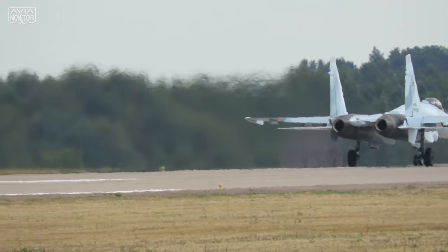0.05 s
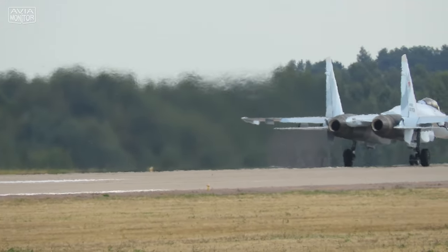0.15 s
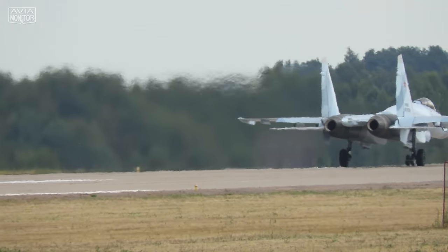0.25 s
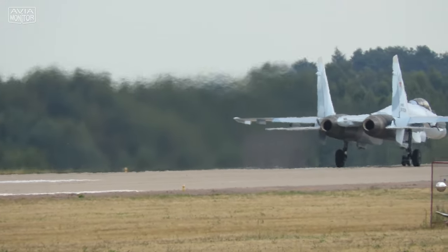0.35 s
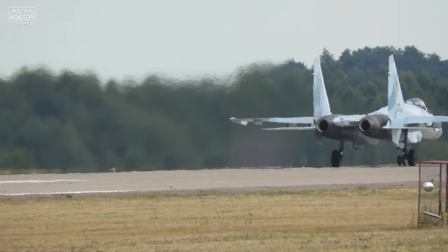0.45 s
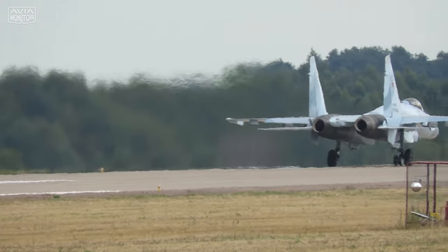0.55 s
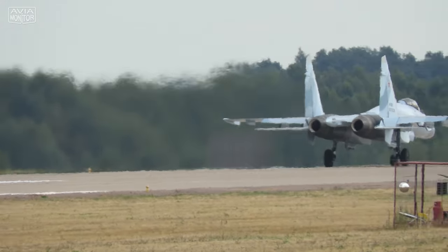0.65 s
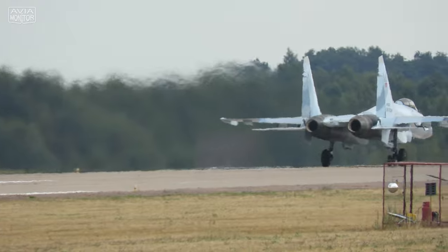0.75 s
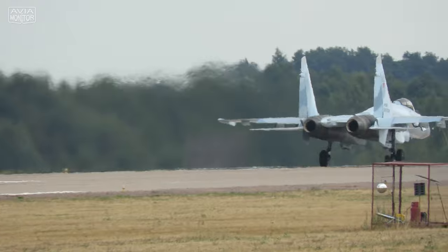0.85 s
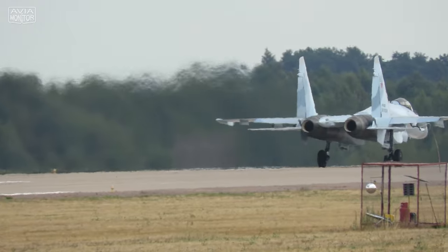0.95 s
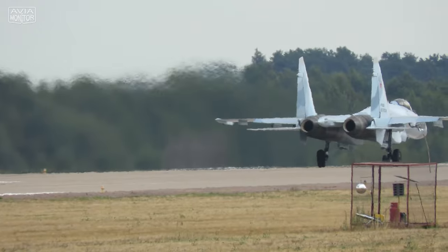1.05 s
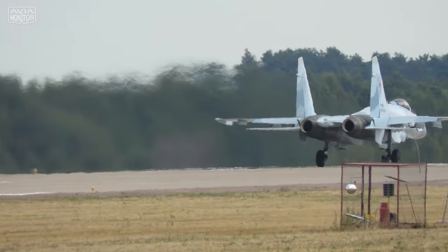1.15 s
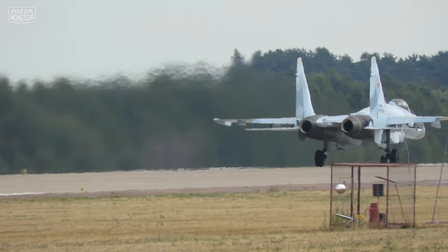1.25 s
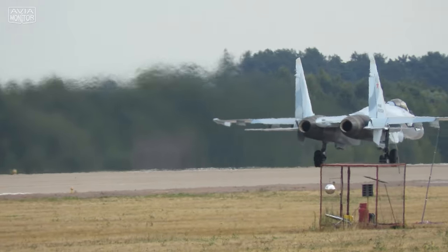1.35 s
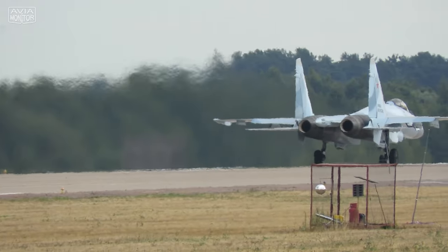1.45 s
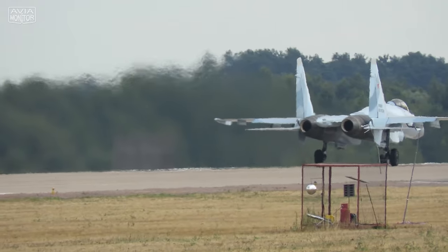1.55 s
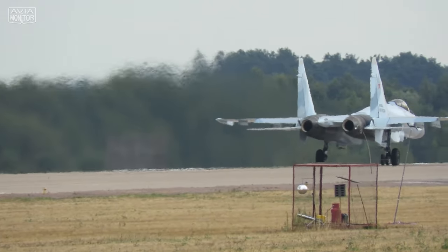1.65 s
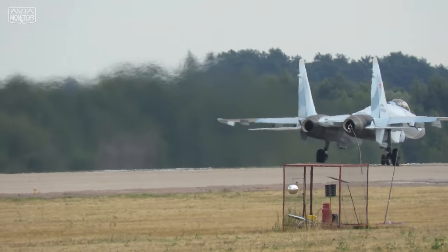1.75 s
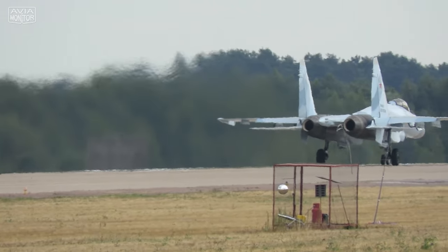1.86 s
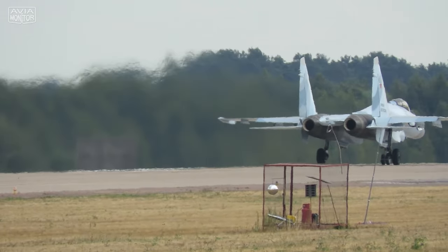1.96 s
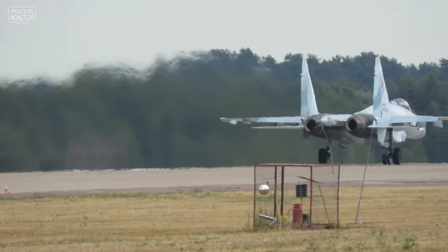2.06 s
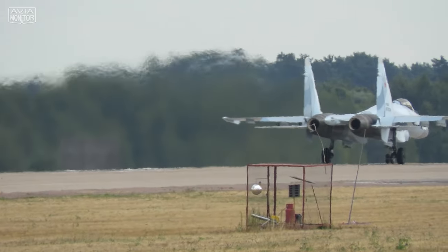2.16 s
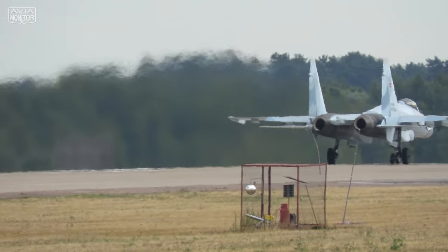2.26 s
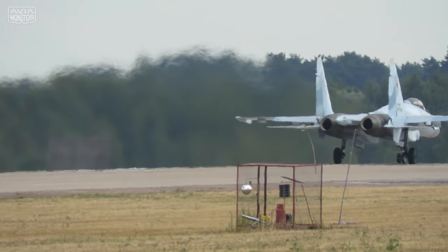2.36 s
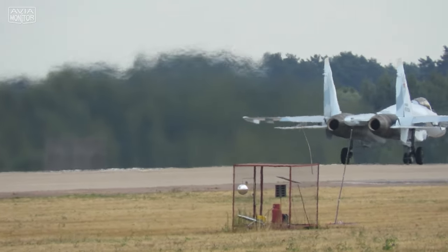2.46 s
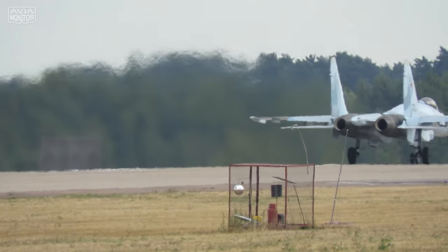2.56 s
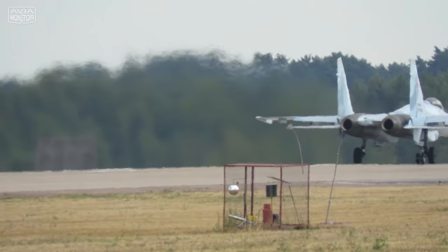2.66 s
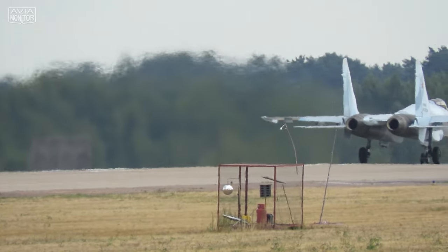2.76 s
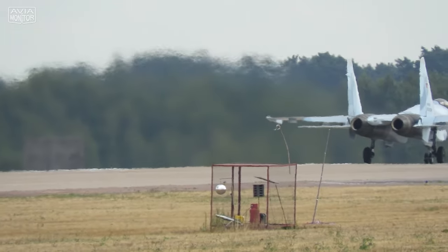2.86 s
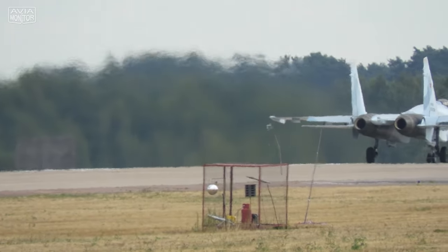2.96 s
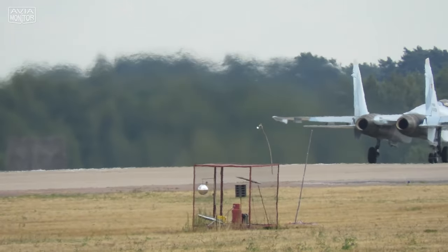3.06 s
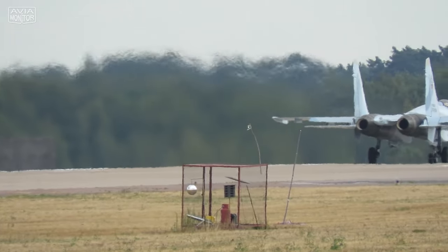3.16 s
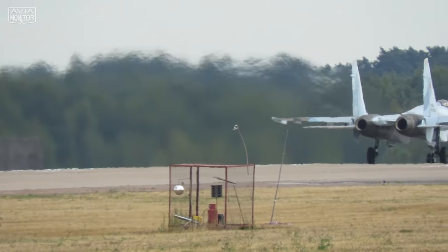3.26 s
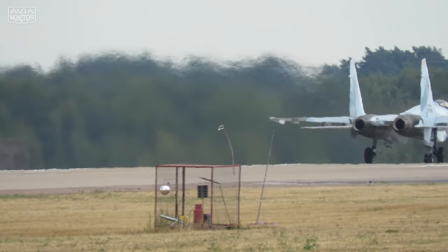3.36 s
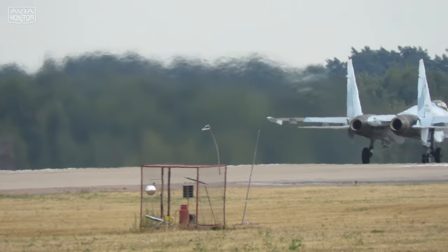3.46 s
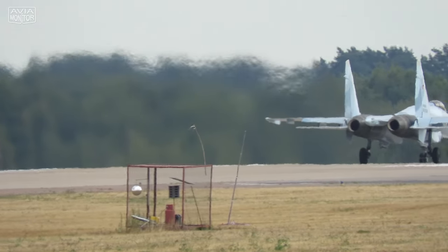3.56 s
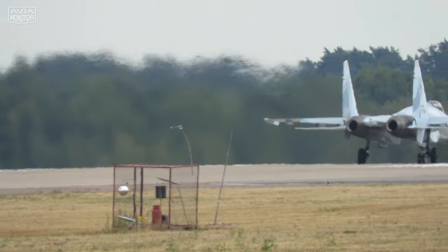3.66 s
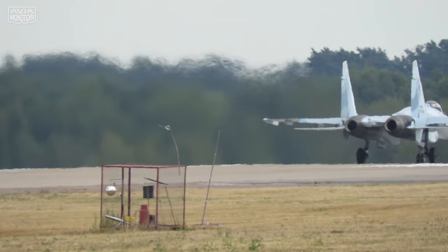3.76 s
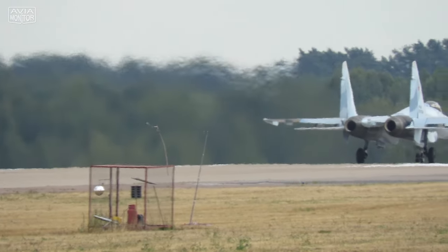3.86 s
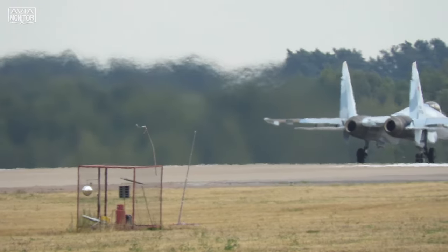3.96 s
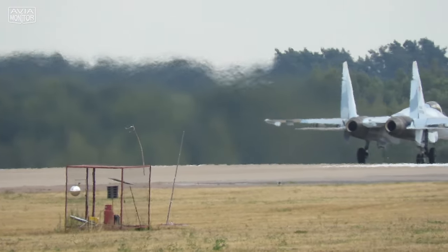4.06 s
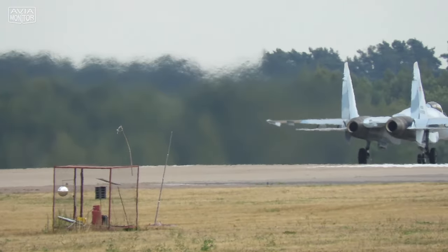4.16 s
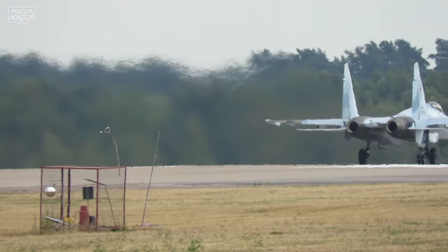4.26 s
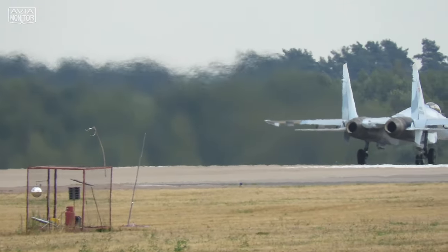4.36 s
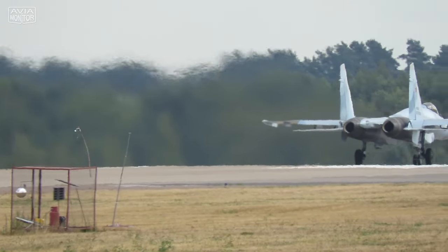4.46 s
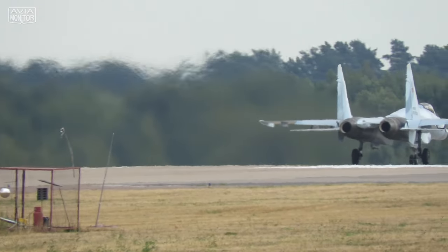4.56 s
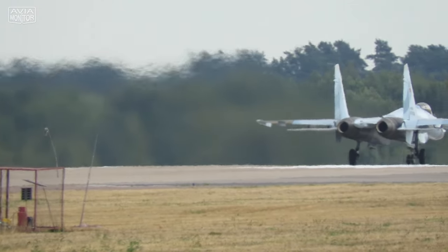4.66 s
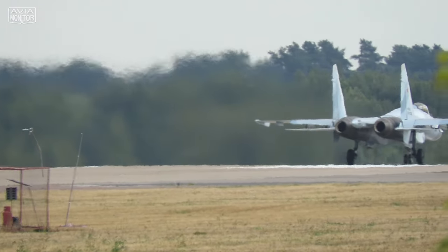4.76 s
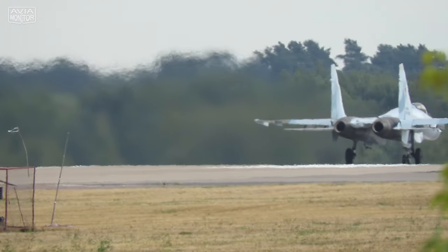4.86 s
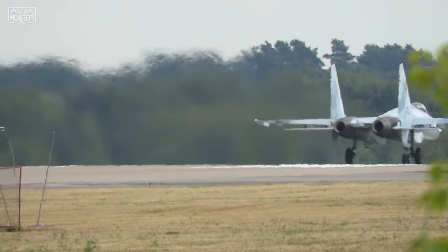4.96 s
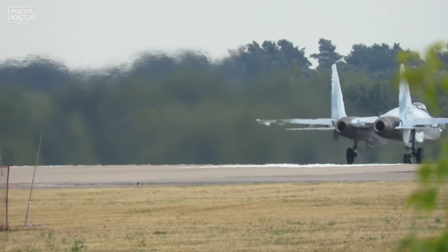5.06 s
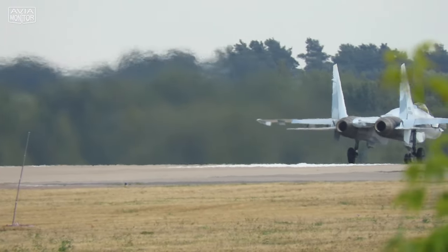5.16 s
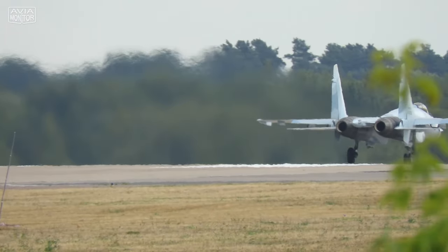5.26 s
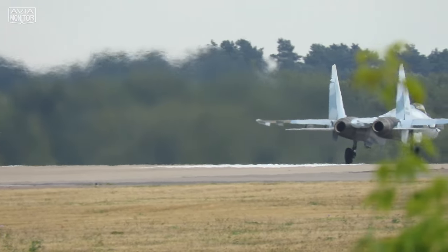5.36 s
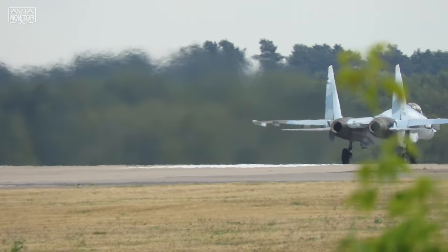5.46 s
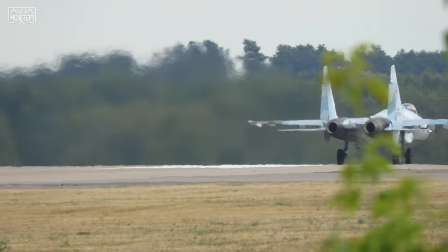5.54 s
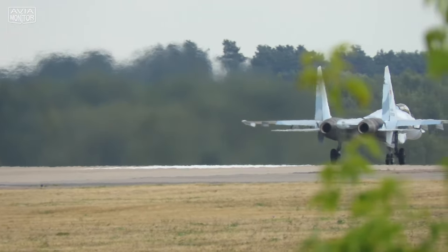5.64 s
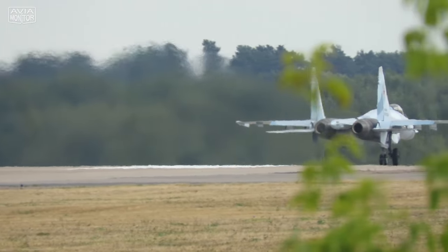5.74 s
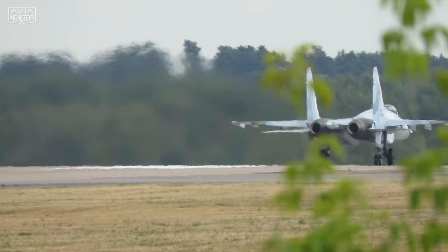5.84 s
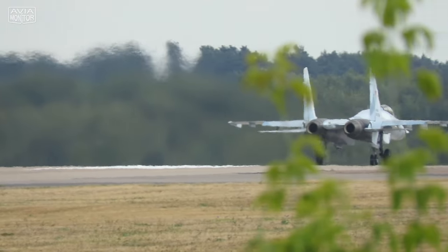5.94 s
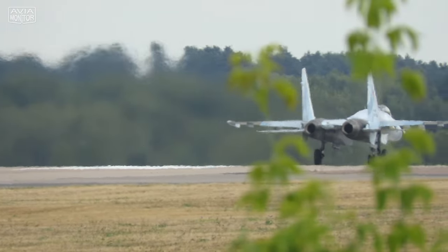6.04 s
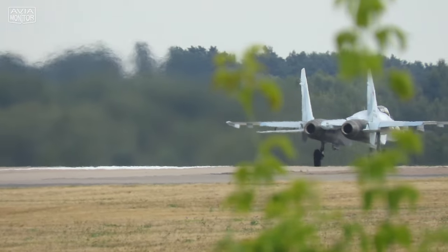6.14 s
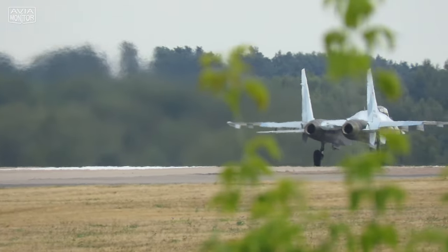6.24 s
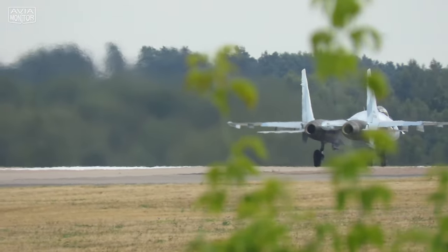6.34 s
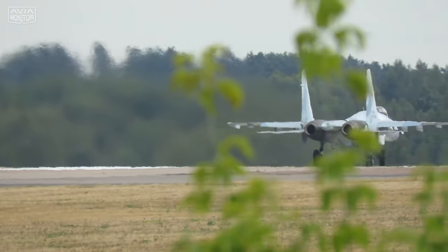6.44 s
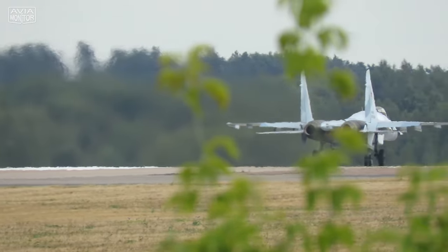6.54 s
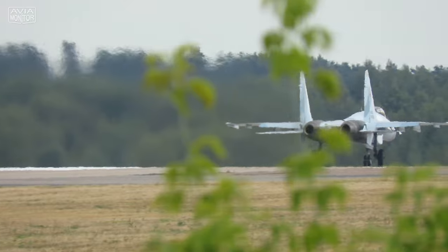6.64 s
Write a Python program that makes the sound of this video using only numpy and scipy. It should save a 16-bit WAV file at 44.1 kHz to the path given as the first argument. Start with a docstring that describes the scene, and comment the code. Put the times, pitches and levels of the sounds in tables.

```python
"""A twin-engined jet, some hundred metres off and seen from behind, spools up and rolls away down a runway.
Its swirling exhaust roars, rumbles and rasps; its turbines and fans whoosh, hiss and faintly whine.
The field reflects the sound, the air takes away treble, and warm moving air makes it waver.
Behind the jet lie the airfield's deep rumble and the recorder's own hiss and thin whistle."""
import sys
import numpy as np
from scipy import signal
from scipy.fft import rfft, irfft, next_fast_len
from scipy.io import wavfile

SR = 44100
rng = np.random.default_rng(int(sys.argv[2]) if len(sys.argv) > 2 else 0)


def generate_wav(signal):
    """Clip the signal to [-1, 1] and save it as 16-bit WAV at the path in sys.argv[1]."""
    frames = np.transpose(np.atleast_2d(signal))
    scaled = np.clip(frames, -1, 1) * 32767
    pcm = np.round(scaled).astype(np.int16)
    wavfile.write(sys.argv[1], SR, pcm)


N = 295470

# The exhaust's roar growing as the throttles open: (time [s], level [dB])
ROAR_LEVELS = [(0, -46), (.6, -45.5), (1.2, -46.5), (1.85, -42), (2.1, -40.5), (2.5, -36.5), (2.85, -34.5),
               (3, -29.5), (3.25, -25.5), (3.38, -22), (3.5, -21), (3.62, -21.5), (3.77, -25),
               (3.95, -20.5), (4.18, -21), (4.3, -19), (4.45, -19), (5, -18.5), (5.5, -16), (5.8, -17.5),
               (6.05, -15.5), (6.16, -17), (6.25, -16.5), (6.45, -18), (6.7, -17.5)]
# How the sound leans to treble (+) or bass (-) as the exhaust swings and the air shifts:
# (time [s], roar tilt [dB per octave], rasp tilt [dB per octave], rasp swell [dB])
EXHAUST_COLOUR = [(0, -2, -2, -0.5), (.7, 2.5, 1.5, 1), (1.5, 3, 4, -0.5), (1.9, 4, -3, 0),
                  (2.3, -0.5, 0.5, 0), (2.8, -3.5, -0.5, 1), (3.1, 0.5, 1, 1.5), (3.4, -0.5, -0.5, 1.5),
                  (3.6, -4, 0, -0.5), (3.75, -0.5, -0.5, -0.5), (3.95, -1, -1, 1), (4.25, -0.5, 0.5, 0.4),
                  (4.6, 1.5, -0.5, 0.5), (4.85, 2.5, 0, -0.2), (5.1, -0.5, -0.6, 0.8),
                  (5.45, -1.5, -0.5, 0.7), (5.7, 0.5, -1, 0.6), (6, 0, 0, -0.5), (6.35, 0, -0.5, -0.5),
                  (6.7, -1.5, -0.4, 0.5)]
# The rumble of the largest swirls, early to rise and early to level off: (time [s], level [dB])
RUMBLE_LEVELS = [(0, -44.5), (.9, -42), (1.45, -40.5), (1.75, -39.5), (2.05, -33.5), (2.3, -35.5),
                 (2.7, -35), (3, -29), (3.4, -23), (3.8, -26), (4, -23), (4.35, -20.5), (4.6, -23),
                 (4.85, -19), (5.1, -23), (5.4, -22), (5.8, -26), (6.1, -24), (6.7, -24.5)]
# The tone of the fan blades: (time [s], level [dB])
FAN_LEVELS = [(0, -68), (.8, -62), (1.5, -63), (1.95, -65), (2.25, -55), (2.6, -61.5), (2.9, -56),
              (3.4, -54), (3.8, -62.5), (6.7, -71)]
# The thin hiss above the fan: (time [s], level [dB])
WISP_LEVELS = [(0, -82), (1.9, -80), (2.3, -70), (2.55, -73), (2.8, -65), (3.2, -69), (3.6, -75),
               (4.1, -77), (4.3, -71), (4.6, -74), (5.1, -71), (5.45, -63.5), (5.9, -69), (6.3, -80)]
# The compressor's tones before they fade: (frequency [Hz], level [dB])
WHINE_TONES = [(2920.5, -74), (4435.5, -86)]

# The exhaust's low roar: (frequency [Hz], relative level [dB])
ROAR_SPECTRUM = [(60, -14), (130, -6.5), (165, -5.5), (200, -3), (250, -0.2), (300, -2), (350, -1),
                 (410, -2), (480, -8), (550, -13), (800, -22.5)]
# The exhaust's deep rumble: (frequency [Hz], relative level [dB])
RUMBLE_SPECTRUM = [(22, -28), (32, -24), (50, -8.5), (75, -1), (95, -3), (120, -5), (160, -10),
                   (260, -16.5)]
# The exhaust's brighter rasp: (frequency [Hz], relative level [dB])
RASP_SPECTRUM = [(300, -17), (480, -1), (620, -2.5), (800, -3.5), (1050, -6), (1400, -10.5), (2200, -19),
                 (3200, -31.5), (3700, -39), (4300, -51.5), (5500, -66.5)]
# The whoosh of turbines and fans: (frequency [Hz], relative level [dB])
WHOOSH_SPECTRUM = [(200, -24.5), (400, -8), (520, -3.5), (650, -1.5), (760, -2), (880, -5.5), (1050, -2),
                   (1300, -6), (1450, -8), (1700, -9), (2000, -13), (2350, -20.5), (3200, -27.5),
                   (4500, -44)]
# The airfield's background rumble: (frequency [Hz], relative level [dB])
AIRFIELD_SPECTRUM = [(15, -23), (25, -15.5), (45, 6), (70, -9), (110, -18)]
# The recorder's hiss: (frequency [Hz], relative level [dB])
HISS_SPECTRUM = [(2000, 4.5), (5000, 0), (8000, -1), (12000, -2), (16000, -2.5)]

STEP = 64  # samples between the values of a slowly changing control


def exhaust_roar():
    """Hot exhaust churns the air, roaring louder as the throttles open."""
    roar_db, = along(ROAR_LEVELS)
    tilt_db, _, _ = along(EXHAUST_COLOUR)
    noise = turbulent(ROAR_SPECTRUM, tilt_db, swell_db=0.2, flicker_db=1.03, flicker_hz=6.4, pivot_hz=280)
    return undb(roar_db) * noise


def exhaust_rumble():
    """The largest swirls in the exhaust make its deepest sound."""
    rumble_db, = along(RUMBLE_LEVELS)
    noise = turbulent(RUMBLE_SPECTRUM, tilt_db=0, swell_db=0.6, flicker_db=0.5, flicker_hz=4.9)
    return undb(rumble_db) * noise


def exhaust_rasp():
    """The exhaust's harsh edge: part of it grows with the roar at once, the rest trails behind."""
    idle_db, prompt_share, db_per_roar_db = -49, 0.55, 1.012
    roar_db, = along(ROAR_LEVELS)
    _, tilt_db, swell_db = along(EXHAUST_COLOUR)
    rise_db = roar_db - roar_db[0]
    trail_db = trailing(rise_db, lag_s=0.83)
    growth_db = db_per_roar_db * (prompt_share * rise_db + (1 - prompt_share) * trail_db)
    tilt_db = tilt_db - 0.3 - 0.15 * (rise_db - trail_db)  # duller while the roar climbs quickly
    noise = turbulent(RASP_SPECTRUM, tilt_db, swell_db=0.8, flicker_db=0.8, flicker_hz=6.7)
    return undb(idle_db + swell_db + growth_db) * noise


def turbine_whoosh(t):
    """Air rushes through the turbines and fans, slowly getting louder and brighter."""
    whoosh_db, tilt_db = -42 + 0.8 * t, -0.8 + 0.3053 * t
    noise = turbulent(WHOOSH_SPECTRUM, tilt_db, swell_db=0.6, flicker_db=1.34, flicker_hz=5.45)
    return undb(whoosh_db) * noise


def ground_reflection(direct):
    """Adds the dull copy that bounces off the field; its delay drifts with the air."""
    echo_gain, top_hz = 0.16, 676
    dull = signal.sosfilt(signal.butter(1, top_hz, fs=SR, output="sos"), direct)
    delay_s = 0.003165 + 0.00044 * smooth(walk(1.967))
    echo = np.interp(np.arange(N) - delay_s * SR, np.arange(N), dull)
    return (direct + echo_gain * echo) / np.hypot(1, echo_gain)


def fan_hiss(t):
    """Moving air smears the fan blades' tone into a hiss; its pitch sinks, then holds."""
    fan_db, = along(FAN_LEVELS)
    pitch_hz = np.interp(t, [1.4, 2.8583], [2960, 2610])
    return undb(fan_db) * smeared(pitch_hz, spread_hz=360)


def wisps():
    """A thin hiss, higher than the fan, comes and goes with the air."""
    wisp_db, = along(WISP_LEVELS)
    return undb(wisp_db) * smeared(np.full(N, 3960), spread_hz=610)


def compressor_whine(t):
    """Faint compressor tones waver, and fade as the jet turns its tail."""
    waver_hz, fade_start_s, fade_db_per_s = 3, 1.5, 7.5
    tones = 0
    for hz, db in WHINE_TONES:
        pitch_hz = hz + waver_hz * smooth(walk(3))
        tones += undb(db) * np.sqrt(2) * np.sin(2 * np.pi * np.cumsum(pitch_hz) / SR)
    return tones * undb(-fade_db_per_s * np.maximum(t - fade_start_s, 0))


def airfield_rumble():
    """A steady deep rumble comes from all around."""
    return steady_noise(AIRFIELD_SPECTRUM, db=-49)


def recorder_noise():
    """The recorder makes a slightly wavering hiss and a thin steady whistle."""
    waver_db, whistle_hz, whistle_db = 0.45, 13426.6, -80.5
    hiss = steady_noise(HISS_SPECTRUM, db=-59.5) * smooth(undb(waver_db * walk(6)))
    whistle = undb(whistle_db) * np.sqrt(2) * np.sin(2 * np.pi * whistle_hz * np.arange(N) / SR)
    return hiss + whistle


def turbulent(table, tilt_db, swell_db, flicker_db, flicker_hz, pivot_hz=700):
    """Churning air: noise bands swell together, flicker alone and lean by tilt_db per octave."""
    spectrum, octave, size = coloured(table)
    swell = walk(2.157)
    tilt_db = (tilt_db + np.zeros(N))[::STEP]
    noise = 0
    for centre in np.arange(np.log2(table[0][0]) - .5, np.log2(table[-1][0]) + 1, .5):  # half octaves
        share = np.cos(np.pi * np.clip(octave - centre, -.5, .5)) ** 2
        band = irfft(spectrum * share, size)[:N]
        lean_db = tilt_db * (centre - np.log2(pivot_hz))
        band_db = lean_db + swell_db * swell + flicker_db * walk(flicker_hz)
        noise += smooth(undb(band_db)) * band
    return noise


def smeared(hz, spread_hz):
    """Scrambles a tone's strength and timing, turning it into a band of hiss."""
    lowpass = signal.butter(2, spread_hz, fs=SR, output="sos")
    scatter = signal.sosfilt(lowpass, rng.standard_normal((2, N)))
    phase = 2 * np.pi * np.cumsum(hz) / SR
    return level(scatter[0] * np.cos(phase) + scatter[1] * np.sin(phase), 0)


def steady_noise(table, db):
    """Unchanging noise with the table's balance of bass and treble."""
    spectrum, _, size = coloured(table)
    return level(irfft(spectrum, size)[:N], db)


def coloured(table):
    """A noise spectrum shaped by the table, its frequencies in octaves, and its length in samples."""
    size = next_fast_len(N)
    octave = np.log2(np.maximum(np.arange(size // 2 + 1) * SR / size, 1))
    hz, db = np.transpose(table)
    points = np.log2(hz)
    outside = np.maximum(points[0] - octave, 0) + np.maximum(octave - points[-1], 0)
    gain = undb(np.interp(octave, points, db) - 30 * outside)  # falls 30 dB per octave past the ends
    return rfft(rng.standard_normal(size)) * level(gain, 0), octave, size


def walk(rate_hz):
    """A slow control that glides to a new random value, mostly within +-1, rate_hz times a second."""
    position = np.arange(0, N, STEP) * rate_hz / SR
    targets = rng.standard_normal(int(position[-1]) + 2)
    k = position.astype(int)
    glide = (position - k) ** 2 * (3 - 2 * (position - k))
    return targets[k] + glide * (targets[k + 1] - targets[k])


def trailing(x, lag_s):
    """Follows x sluggishly, starting from zero."""
    keep = np.exp(-1 / (lag_s * SR))
    return signal.lfilter([1 - keep], [1, -keep], x)


def smooth(control):
    """Fills in a slow control at every sample."""
    return np.interp(np.arange(N), np.arange(0, N, STEP), control)


def along(table):
    """Fills in each column after the time column at every sample."""
    times, *columns = np.transpose(table)
    return [np.interp(np.arange(N) / SR, times, column) for column in columns]


def level(x, db):
    """Sets the average (rms) level of x."""
    return x * undb(db) / np.sqrt(np.mean(x ** 2))


def undb(db):
    """Turns decibels into a number to multiply by."""
    return 10 ** (np.asarray(db) / 20)


def scene():
    """The jet and its bounce off the field, over the airfield's rumble, in one channel."""
    t = np.arange(N) / SR
    jet = exhaust_rumble() + exhaust_roar() + exhaust_rasp() + turbine_whoosh(t)
    mix = wisps() + ground_reflection(jet) + fan_hiss(t) + compressor_whine(t) + airfield_rumble()
    return mix[None]


def record(dry):
    """Adds the recorder's noise and cuts the highest treble."""
    top_hz = 15750
    lowpass = signal.ellip(12, .2, 70, top_hz, fs=SR, output="sos")
    return signal.sosfilt(lowpass, dry + recorder_noise())


dry = scene()
out = record(dry)
generate_wav(out)
```